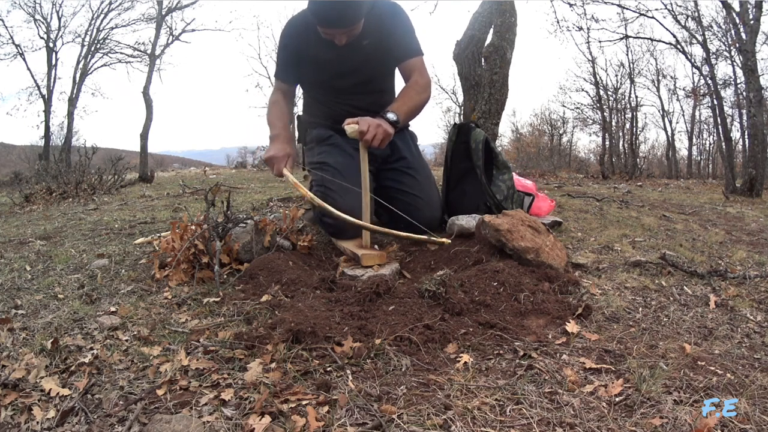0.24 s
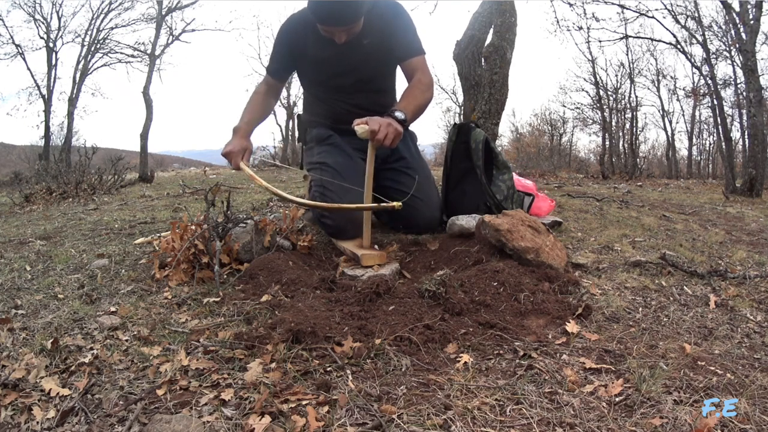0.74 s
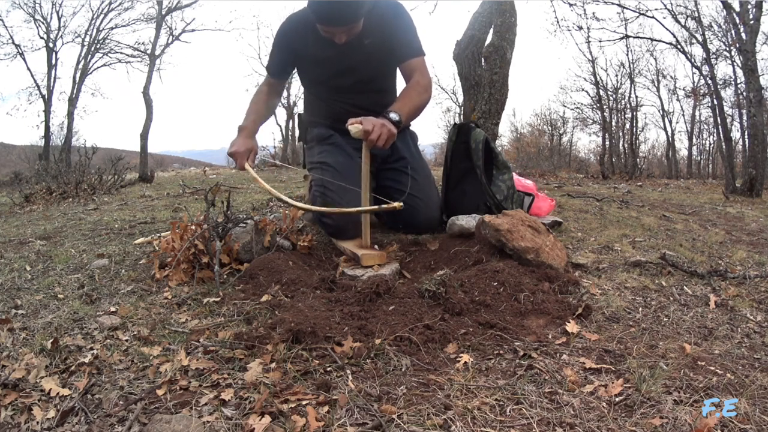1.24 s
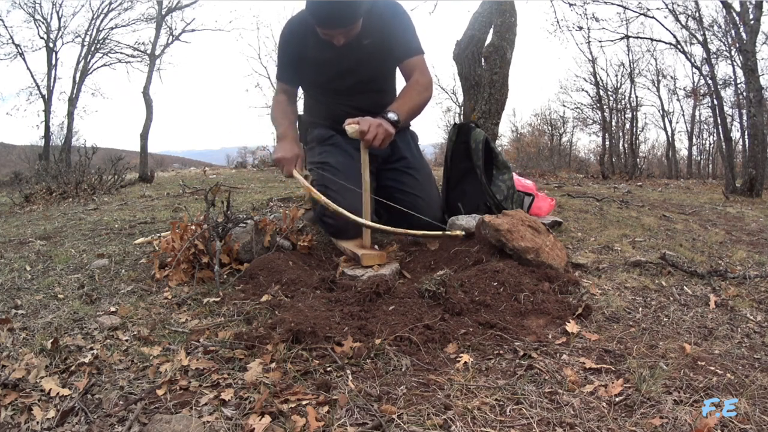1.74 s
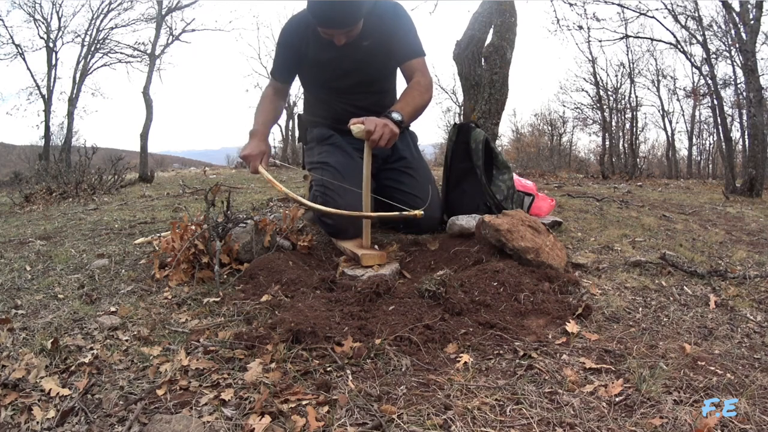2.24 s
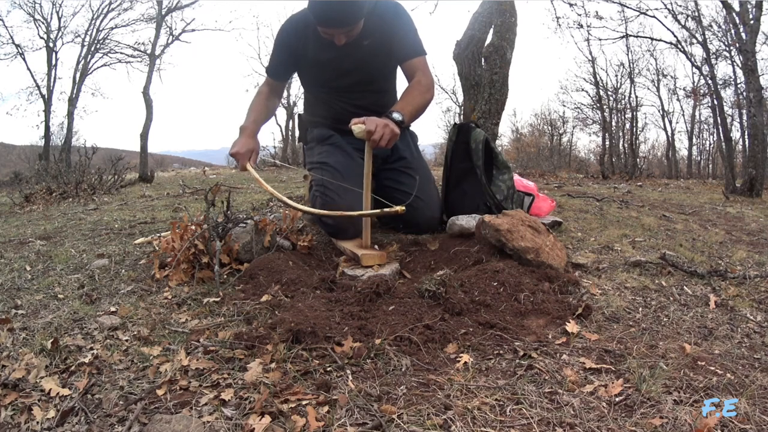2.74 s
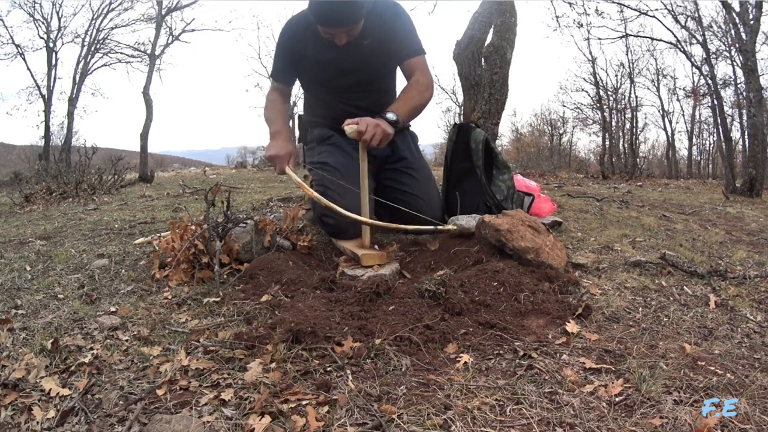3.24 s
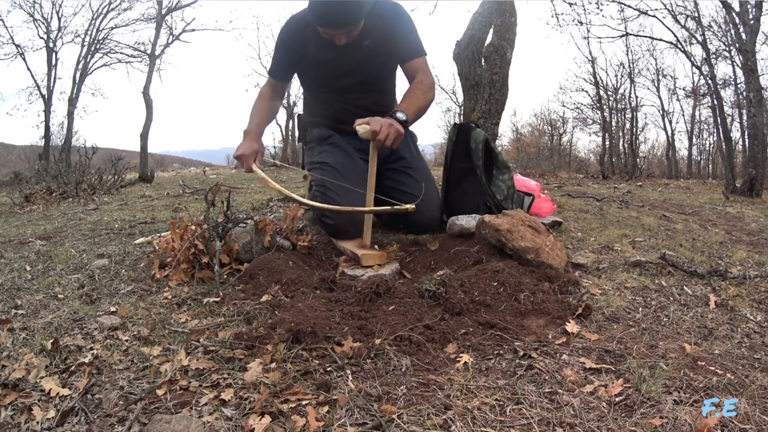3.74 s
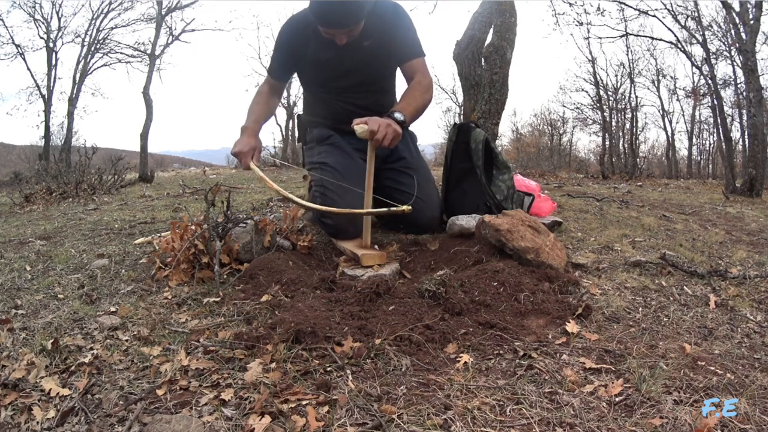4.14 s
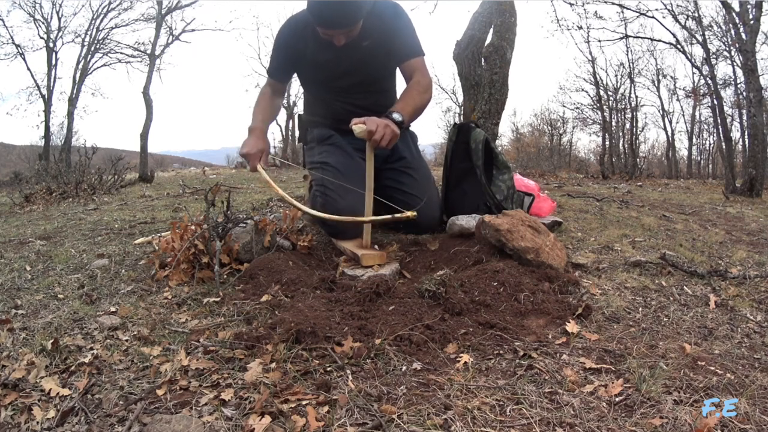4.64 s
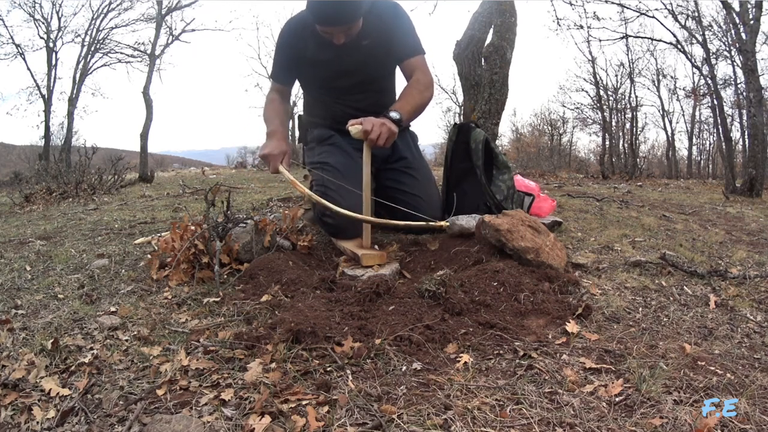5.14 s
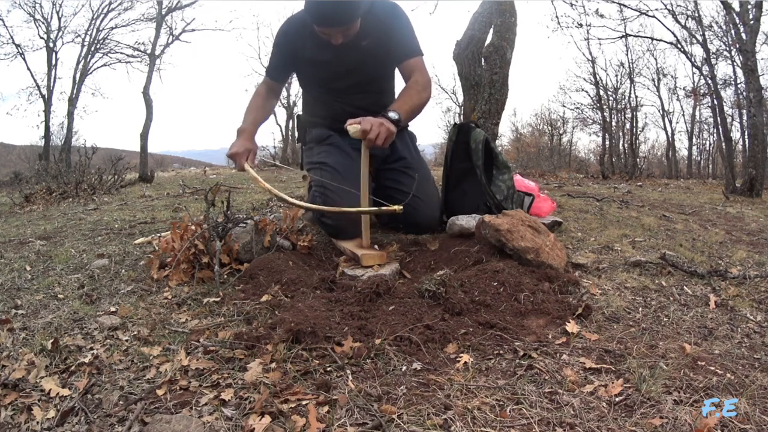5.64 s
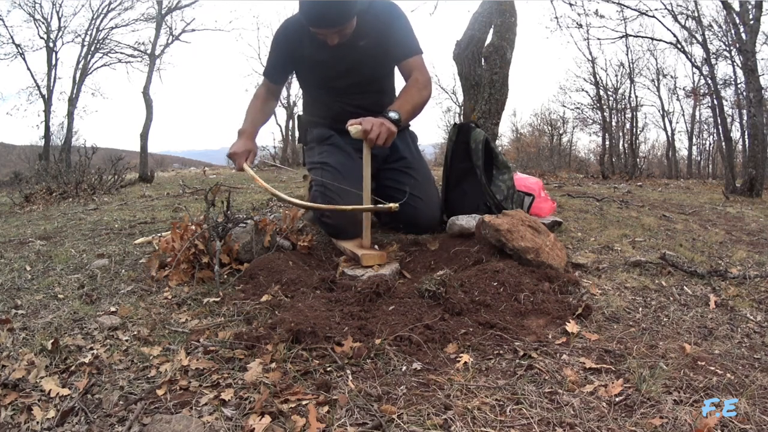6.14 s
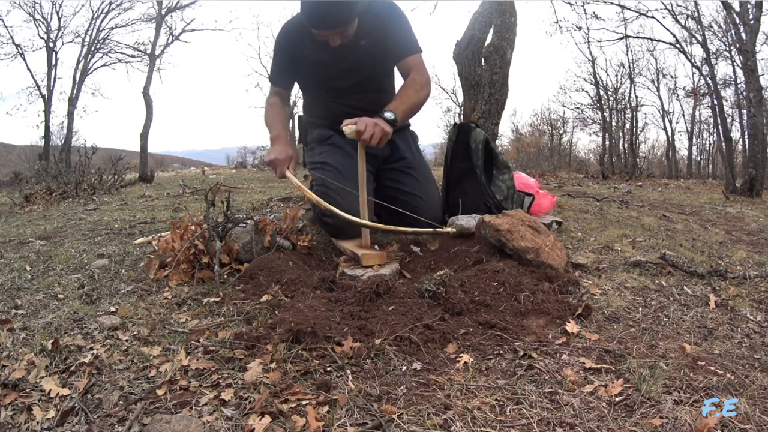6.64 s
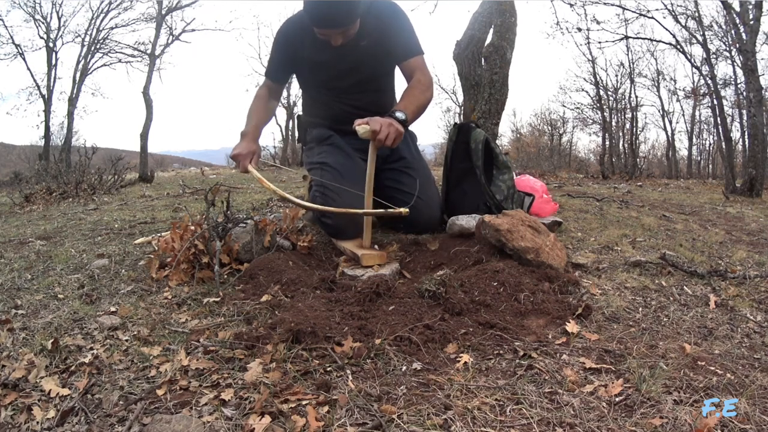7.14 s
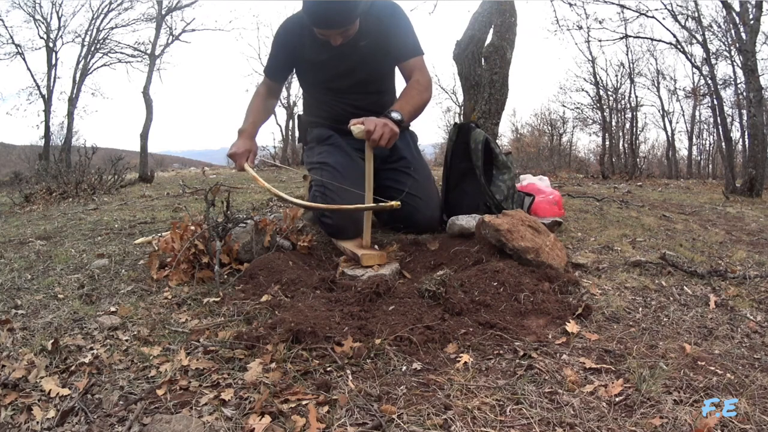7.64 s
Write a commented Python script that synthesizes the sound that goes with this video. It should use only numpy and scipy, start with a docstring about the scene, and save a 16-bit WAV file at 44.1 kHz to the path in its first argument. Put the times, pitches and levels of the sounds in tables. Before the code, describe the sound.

A wooden bow drill squeaks in quick back-and-forth strokes, bright chirping squeals alternating with harsh rasps, outdoors, with wind rumbling on the microphone later.

```python
"""Bow drill in the open air

A dry wooden spindle works against a hearth board, a little left of centre, over faint still air.
Stick-slip makes each light stroke a run of squeaks: short, nearly pure tones with overtones.
On heavy strokes the squeak sinks and breaks into a rasp: jerks and noise drive wood resonances.
After about three seconds wind rumbles on the microphone ports, as filtered noise under gust envelopes."""
import sys
import numpy as np
from scipy import signal
from scipy.fft import rfft, irfft
from scipy.io import wavfile
from scipy.ndimage import uniform_filter1d

SR = 44100
rng = np.random.default_rng(int(sys.argv[2]) if len(sys.argv) > 2 else 0)


def bounce(signal):
    """Save signal as a 16-bit WAV file at the path given by the first command-line argument."""
    frames = np.transpose(np.atleast_2d(signal))
    limited = np.clip(frames, -1, 1)
    pcm = np.round(limited * 32767).astype(np.int16)
    wavfile.write(sys.argv[1], SR, pcm)


N = 347508
TIME = np.arange(N) / SR


def undb(db):
    """Logarithmic level: decibels to amplitude gain."""
    return 10 ** (np.asarray(db) / 20)


def unit(x):
    """Normalisation of power: scale to rms 1."""
    return x / np.sqrt(np.mean(x ** 2))


def walk(rate):
    """Band-limited randomness: low-passed noise of rms 1, its gain down to 1/e at rate Hz."""
    gain = np.exp(-(np.fft.rfftfreq(N, 1 / SR) / rate) ** 2)
    return unit(irfft(rfft(rng.standard_normal(N)) * gain, N))


def flutter(db, rate):
    """Random amplitude modulation: a gain that wanders within db up and down."""
    return undb(db * np.tanh(walk(rate)))


def noise(spectrum):
    """Spectral shaping: Gaussian noise of rms 1, coloured by a table of (f/Hz, level/dB)."""
    hz, db = np.transpose(spectrum)
    frequencies = np.fft.rfftfreq(N, 1 / SR) + 1
    gain = undb(np.interp(np.log(frequencies), np.log(hz), db))
    return unit(irfft(rfft(rng.standard_normal(N)) * gain, N))


def swell(u, lean=.12):
    """Amplitude envelope: quick rise, flat top, slower fall; near half height at u = -1 and 1."""
    return 1 / (1 + (u * (1 - lean * np.tanh(u))) ** 4)


def around(centre, length):
    """Local time scale: the samples near an event, and their time in half lengths from its centre."""
    near = slice(*np.searchsorted(TIME, [centre - 3 * length, centre + 3 * length]))
    return near, 2 * (TIME[near] - centre) / length


# resonances of spindle and board: [f/Hz, width/Hz, relative level/dB]
WOOD_MODES = [(270, 295, 5), (670, 1600, -21.5), (984, 200, 6), (1460, 59, -27), (1973, 255, 16),
              (2505, 158, 15), (3303, 100, 4.5), (3854, 590, 8), (5440, 100, -13), (5920, 1110, 4),
              (8116, 550, 12.5), (9760, 230, 8)]


def ring(force):
    """Modal resonance: the modes trade energy as the contact travels round; their sum keeps rms 1."""
    modes_sum = 0
    for hz, width, db in WOOD_MODES:
        mode = signal.lfilter(*signal.iirpeak(hz, hz / width, fs=SR), force)
        modes_sum = modes_sum + undb(db) * mode * flutter(5, 50)
    return modes_sum / np.sqrt(uniform_filter1d(modes_sum ** 2, size=160))


# spectrum of still open air: [f/Hz, relative level per Hz/dB]
AIR_SPECTRUM = [(25, 2), (220, -2), (600, -10), (4000, -8.5), (15000, -60.5)]


def still_air(mid_db=-54, side_db=-66):
    """Diffuse background noise: a part shared by both channels and a weaker part opposed between them."""
    mid = undb(mid_db) * noise(AIR_SPECTRUM)
    side = undb(side_db) * noise(AIR_SPECTRUM)
    return mid + side * np.array([[1], [-1]])


# the squeal of a heavy stroke: pitch it sinks to (Hz), time constant (s), fade over the stroke (dB)
LOW_HZ, SINK_S, SQUEAL_FADE_DB = 1467, .03, 12.5
# share of the time that it sounds: at the start, and added by the end, when the catches run together
SQUEAL_DUTY, SQUEAL_MERGE = 0.37, 0.27
# slide within a catch, as a share per half length: downward, vanishing by the end of the stroke
HEAVY_SLIDE = -.022
# heavy return strokes: [first catch t/s, time to the last catch t/s, number of later catches,
# first catch nominal level/dB, its nominal f/Hz, its length t/s, low squeal level before its fade/dB,
# delay to the hardest grinding t/s, one spindle turn t/s, grinding level/dB, its growth per turn/dB]
HEAVY_STROKES = [(-.1, .125, 4, -14, 1720, .018, -35, 0.071, 0.036, -14, 0),
                 (0.254, .165, 4, -13.5, 1715, 0.013, -13.5, 0.072, 0.04, -15, 1),
                 (.666, .138, 6, -13.5, 1700, 0.027, -19.5, 0.069, 0.043, -12.5, -1),
                 (1.049, .126, 5, -14.5, 1602, 0.02, -14, 0.069, .037, -11, -1),
                 (1.426, .113, 4, -22.5, 1537, .027, -16, 0.078, 0.042, -12.5, -4),
                 (1.802, .112, 4, -9, 1750, 0.016, -12, 0.069, .035, -15, -1.5),
                 (2.188, .122, 5, -8.5, 1699, .015, -12.5, .073, 0.039, -15, -1),
                 (2.585, .119, 5, -11, 1717, 0.015, -17, 0.063, .03, -14, 0),
                 (2.929, .123, 5, -18, 1614, 0.03, -21, 0.075, 0.041, -13, -1),
                 (3.305, 0.16, 6, -13, 1670, 0.017, -19, 0.071, 0.041, -14.5, -3),
                 (3.677, .107, 4, -12, 1680, 0.014, -11, 0.079, 0.04, -14.5, 1),
                 (4.068, .128, 5, -10, 1714, 0.025, -19, 0.08, 0.039, -14, 0),
                 (4.449, .14, 5, -11, 1789, 0.021, -19, 0.073, 0.036, -15, 1.5),
                 (4.803, .141, 6, -12.5, 1773, 0.02, -15, 0.072, .042, -11.5, 1.5),
                 (5.216, 0.081, 5, -14.5, 1530, 0.015, -18.5, .06, 0.037, -14.5, -5),
                 (5.564, .12, 4, -8.5, 1759, 0.014, -9, 0.09, 0.032, -18, 1.5),
                 (5.947, .142, 6, -13.5, 1730, 0.023, -9, 0.085, 0.036, -17.5, -1.5),
                 (6.343, .121, 4, -11, 1770, 0.021, -8.5, 0.078, 0.039, -21, 2),
                 (6.73, .125, 4, -9, 1737, .011, -8.5, .072, .034, -16.5, 1),
                 (7.102, .12, 4, -11, 1627, 0.014, -10.5, 0.058, 0.03, -14, 4.5),
                 (7.468, .11, 4, -12, 1781, 0.016, -6, 0.075, 0.044, -20, 3.5),
                 (7.878, .12, 4, -9, 1835, 0.023, -19, .075, 0.046, -18.5, 5.5)]


def heavy_catches(start, length, count, first_db, hz, first_length, squeal_db, *_):
    """Loaded stick-slip: after one clear squeak, catches sink, fade and merge as the arm bears down."""
    count = round(count)
    way = np.arange(1, count + 1) / count
    times = start + length * way
    levels = squeal_db - SQUEAL_FADE_DB * way
    pitches = LOW_HZ + (hz - LOW_HZ) * np.exp(-length * way / SINK_S)
    lengths = (SQUEAL_DUTY + SQUEAL_MERGE * way) * length / count
    later = np.column_stack([times, levels, pitches, lengths, HEAVY_SLIDE * (1 - way)])
    return np.vstack([(start, first_db, hz, first_length, HEAVY_SLIDE), later])


# no two catches are alike: scatter of level (dB), and of pitch (share)
CATCH_SCATTER_DB, CATCH_DETUNE = 2.1, 0.00811


def bowing():
    """Irregular friction: all catches in time order, [t/s, level/dB, f/Hz, length/s, slide], scattered."""
    light = [light_catches(*row) for row in LIGHT_STROKES]
    heavy = [heavy_catches(*row) for row in HEAVY_STROKES]
    rows = np.vstack(light + heavy + [turning_chirps()])
    centre, db, hz, length, slide = rows[np.argsort(rows[:, 0])].T
    louder, higher = rng.standard_normal((len(rows), 2)).T
    levels = db + CATCH_SCATTER_DB * louder
    pitches = hz * (1 + CATCH_DETUNE * higher)
    return np.column_stack([centre, levels, pitches, length, slide])


# pitch at which the overtones have their tabled level
USUAL_HZ = 1700
# overtones of a squeak, from the second harmonic up: [level re the fundamental/dB]
OVERTONES_DB = [-12.5, -15.5, -25.5, -35, -42, -104]


def squeaks(catches, load, arch=0.01952, waver=0.019, bite_db=44, max_bite_db=12, scrape_db=-25):
    """Stick-slip oscillation: nearly pure tones; a harder grip drags the pitch and sharpens the slips."""
    tone, loudness = np.zeros(N), np.zeros(N)
    wobble = 1 + waver * walk(193)
    colour = np.array([undb(db) * flutter(5, 70) for db in OVERTONES_DB])
    phase_lags = rng.standard_normal(len(catches))
    for (centre, db, hz, length, slide), lag in zip(catches, phase_lags):
        near, u = around(centre, length)
        if not len(u):
            continue
        shape = swell(u)
        # the pitch arches over each catch and slides down as the load grows
        bend = arch * np.minimum(np.abs(u), 2) ** 2 + load[near] - slide * np.clip(u, -2, 2)
        mean_bend = np.average(bend, weights=shape ** 2)
        pitch = hz * wobble[near] * np.exp(mean_bend - bend)
        phase = 2 * np.pi * np.cumsum(pitch) / SR
        # overtones need a full swing, so the skirts of a squeak are pure; bite is in dB per octave of fall
        bite = np.minimum(bite_db * np.log2(USUAL_HZ / pitch), max_bite_db)
        grip = shape * undb(bite)
        overtones = sum(c[near] * np.sin(k * (phase + lag * k)) for k, c in enumerate(colour, 2))
        tone[near] += undb(db) * shape * (np.sin(phase) + grip * overtones)
        loudness[near] += undb(db) * shape * grip
    # the grain of the wood makes each squeak tremble
    tremble = flutter(1.5, 130)
    scrape = undb(scrape_db) * loudness * ring(rng.standard_normal(N))
    return tone * tremble + scrape


def rubbing(catches, sing_db=-42, scrape_db=-53):
    """Threshold of friction: between catches the lightly turning spindle sings and scrapes faintly."""
    centres, _, pitches, *_ = np.transpose(catches)
    hz = np.interp(TIME, centres, pitches) * (1 + 0.017 * walk(49.9))
    touch = unit(flutter(8, 35))
    # the note only starts when the touch is firm enough, so it comes in small chirps
    chirps = unit(np.maximum(np.tanh(walk(24) - 1), 0))
    singing = undb(sing_db) * chirps * np.sin(2 * np.pi * np.cumsum(hz) / SR)
    scraping = undb(scrape_db) * touch * ring(rng.standard_normal(N))
    return singing + scraping


# grinding of a light stroke: centre and length (shares of the stroke)
SCUFF_AT, SCUFF_LENGTH = .68, 0.44
# grinding of a heavy stroke: share of a turn; level of the surge before and after the hardest one (dB)
SURGE_DUTY, SURGE_BEFORE_DB, SURGE_AFTER_DB = .74, -4.5, -2


def grinding():
    """Periodic contact: a late scuff per light stroke, three turns' surges per heavy: [t/s, level/dB, length/s]."""
    events = [(start + SCUFF_AT * length, db, SCUFF_LENGTH * length)
              for start, length, *_, db in LIGHT_STROKES]
    surges_db = (SURGE_BEFORE_DB, 0, SURGE_AFTER_DB)
    for start, *_, delay, turn, db, growth_db in HEAVY_STROKES:
        for k, surge_db in enumerate(surges_db, -1):
            level = db + k * growth_db + surge_db
            events.append((start + delay + k * turn, level, SURGE_DUTY * turn))
    return events


def tip_pressure():
    """Contact pressure: how hard the tip grinds at each moment, starting and stopping promptly."""
    pressure = np.zeros(N)
    for centre, db, length in grinding():
        near, u = around(centre, length)
        pressure[near] += undb(db) * swell(u) * np.exp(-(u / 2) ** 4)
    return pressure


def rasp(pressure, load, slip_hz=1620, sag=.5, skip_db=-11, level_db=-1.5):
    """Disordered stick-slip: uneven jerks and crushed wood dust ring spindle and board."""
    # the turning tip presses unevenly, and each hard moment throws the slips out of their beat
    throb = flutter(4.5, 110)
    disorder = pressure * throb * flutter(6, 30)
    hz = slip_hz * np.exp(-sag * load + .06 * walk(50) + .33 * disorder * walk(900))
    cycles = np.cumsum(hz) / SR
    # bending waves spread each jerk over its cycle
    slips = 0
    for k in range(1, len(OVERTONES_DB)):
        slips = slips + np.cos(2 * np.pi * k * cycles + k ** 2) / np.sqrt(max(k - 2, 1))
    # strong and weak slips alternate at times, which adds an octave below
    slips = slips * (1 + 2 * undb(skip_db) * walk(68) * np.cos(np.pi * cycles))
    dust = rng.standard_normal(N) * flutter(5, 1200)
    force = unit(slips) + disorder * dust
    body = signal.sosfilt(signal.butter(2, 10500, fs=SR, output="sos"), ring(force))
    return undb(level_db) * pressure * unit(body * throb)


# faint chirps as the bow turns round: [centre t/s, nominal level/dB, nominal f/Hz, length t/s]
CHIRPS = [(0.085, -24, 1632, 0.01), (.215, -20, 1830, 0.0056), (2.76, -33, 1620, 0.0078),
          (3.149, -21, 1600, .007), (5.377, -24.5, 1793, 0.028)]


def turning_chirps():
    """Brief stick-slip: catches with no slide of their own as the bow turns round."""
    return np.array([(*chirp, 0) for chirp in CHIRPS])


# a light stroke: share of the time between catches that squeaks
LIGHT_DUTY = .46
# fall of pitch in mid-stroke and at full unevenness (shares), and of level at full unevenness (dB)
MID_SAG, SHORT_SAG, SHORT_DB = 0.035, 0.17, -6
# range of the slide within a catch (share per half length): down at first, up at the end of the stroke
LIGHT_SLIDE = 0.0247
# light strokes: [first catch t/s, time to the last catch t/s, number of catches, speeding up,
# crowding in mid-stroke, shortening of every other catch (below 0: lengthening), nominal level/dB,
# first catch nominal level/dB, its length t/s, nominal f/Hz, pitch rise as a share, grinding level/dB]
LIGHT_STROKES = [(.138, 0.05, 4, 0.13, -0.27, 0.15, -12, -9, 0.006, 1728, 0.1, -16),
                 (0.483, 0.094, 5, -0.14, .45, 0.25, -11.5, -13.5, 0.0083, 1765, .12, -14.5),
                 (.873, 0.1, 6, 0.19, 0.18, 0.4, -13, -15.5, 0.0053, 1777, 0.052, -17),
                 (1.241, 0.13, 5, -0.18, -0.038, 0.41, -10, -11.5, 0.019, 1777, 0.048, -15.5),
                 (1.596, 0.13, 5, .04, -0.16, 0.11, -12.5, -18.5, 0.0082, 1709, 0.053, -17),
                 (1.985, 0.12, 6, 0.48, 0.42, .3, -7, -20.5, 0.014, 1771, .07, -24),
                 (2.399, 0.1, 5, -.15, .51, -0.019, -8, -13.5, 0.0092, 1766, .07, -21.5),
                 (2.797, 0.083, 5, -0.16, 0.17, 0.44, -8, -16.5, 0.013, 1848, 0.038, -31.5),
                 (3.175, 0.081, 5, 0.031, .2, 0.52, -9, -10.5, 0.016, 1784, 0.096, -34),
                 (3.488, 0.14, 7, 0.2, 0.092, 0.4, -8.5, -17, 0.0076, 1768, 0.1, -28),
                 (3.888, 0.1, 4, -.08, -.05, 0.48, -8.5, -21.5, .01, 1755, 0.09, -20.5),
                 (4.275, .11, 6, 0.38, 0.27, 0.32, -7, -21, 0.013, 1793, .12, -24),
                 (4.639, 0.12, 6, .3, 0.22, 0.56, -8.5, -24, 0.022, 1819, 0.094, -32),
                 (4.999, .102, 5, .18, 0.065, -0.16, -9, -22.5, 0.019, 1758, 0.0033, -28),
                 (5.413, 0.093, 4, .5, .1, -0.3, -12.5, -11, 0.009, 1782, 0.094, -33.5),
                 (5.795, 0.096, 6, 0.095, 0.1, 0.25, -8, -10, 0.018, 1813, 0.047, -25.5),
                 (6.181, 0.085, 5, 0.11, 0.26, -0.27, -8.5, -15, 0.0086, 1725, 0.041, -24.5),
                 (6.564, 0.08, 5, 0.00064, 0.07, -.4, -7.5, -10, 0.01, 1690, 0.03, -24.5),
                 (6.947, 0.082, 5, -0.012, -0.066, -0.31, -8.5, -13.5, 0.012, 1706, .065, -21.5),
                 (7.291, 0.11, 6, 0.19, 0.18, -0.28, -9.5, -15, 0.021, 1730, 0.082, -29),
                 (7.713, 0.082, 5, 0.031, -0.017, -0.34, -8.5, -10.5, 0.0098, 1737, 0.058, -27.5)]


def light_catches(start, length, count, speeding, crowd, uneven, db, first_db, first_length, hz, rise, _):
    """Alternating stick-slip: every other catch differs in length and pitch, which climbs as the arm eases."""
    order = np.arange(round(count))
    way = order / order[-1]
    crowding = crowd * np.sin(2 * np.pi * way) / (2 * np.pi)
    times = start + length * (way + speeding * way * (1 - way) + crowding)
    short = uneven * (order[::-1] % 2)
    pitch = hz * np.exp(rise * (way - .5) - MID_SAG * np.sin(np.pi * way) - SHORT_SAG * short)
    lengths = LIGHT_DUTY * np.gradient(times) * (1 - short + uneven / 2)
    # the first catch has its own level and length
    levels = np.where(order, db + SHORT_DB * short, first_db)
    lengths = np.where(order, lengths, first_length)
    return np.column_stack([times, levels, pitch, lengths, LIGHT_SLIDE * (way - .5)])


# whistles when the dry tip scuffs hard: [centre t/s, level/dB, length t/s]
WHISTLES = [(0.188, -13.5, 0.012), (0.58, -15, 0.017), (0.97, -12.5, 0.013)]


def whistles(whistle_hz=2960, under_hz=1060, under_db=-13, waver=0.015):
    """Whistling: a higher spindle note sounds, with a weaker short wooden tone below it."""
    strength = np.zeros(N)
    for centre, db, length in WHISTLES:
        near, u = around(centre, length)
        strength[near] += undb(db) * swell(u)
    clock = 2 * np.pi * np.cumsum(1 + waver * walk(155)) / SR
    return strength * (np.sin(whistle_hz * clock) + undb(under_db) * np.sin(under_hz * clock))


# ramps before and after a gust's full strength
GUST_RISE_S, GUST_FALL_S = 0.13, 0.22
# gusts at the microphone: [start of full strength t/s, its length t/s, relative level/dB]
GUSTS = [(2.897, 4.2, -52.5), (3.13, 0.14, -34.5), (3.5, 0.67, -33.5), (3.72, 0.21, -33.5),
         (4.457, 0.64, -25), (5.39, 0.28, -33), (5.977, 0.24, -35), (6.3, 0.22, -38.5), (7.273, 0.85, -25)]
# sudden buffets on the ports: [centre t/s, relative level/dB]
BUFFETS = [(3.692, -25), (3.84, -21.5), (4.481, -18), (4.858, -21), (5.52, -14.5), (7.28, -24),
           (7.622, -22), (7.676, -25), (7.81, -10.5)]
# wind spectrum shared by both ports: [f/Hz, relative level per Hz/dB]
WIND_SHARED = [(20, -6), (60, 0), (145, -1), (300, -11), (700, -27), (2000, -62)]
# wind spectrum opposed between the ports: [f/Hz, relative level per Hz/dB]
WIND_OPPOSED = [(20, -24), (130, 0), (290, -2), (600, -16), (2000, -54)]


def wind(shared_db=-4, opposed_db=-3, buffet_s=0.025):
    """Turbulent pressure: gusts rumble on two ports, now and then with a short thump."""
    eddies = unit(flutter(6, 35))
    gusts = np.zeros(N)
    for start, length, db in GUSTS:
        corners = [-GUST_RISE_S, 0, length, length + GUST_FALL_S]
        gusts += undb(db) * np.interp(TIME - start, corners, [0, 1, 1, 0]) ** 2
    strength = eddies * gusts
    for centre, db in BUFFETS:
        near, u = around(centre, buffet_s)
        strength[near] += undb(db) * swell(u)
    shared = undb(shared_db) * noise(WIND_SHARED)
    opposed = undb(opposed_db) * noise(WIND_OPPOSED)
    ports = strength * np.array([shared + opposed, shared - opposed])
    # the microphone cuts the deepest bass
    band = signal.butter(2, (32, 2000), "bandpass", fs=SR, output="sos")
    return signal.sosfilt(band, ports)


def clearing(x, near_db=-23, near_t60=0.37, far_db=-35, far_t60=1.0):
    """Diffuse reverberation: ground and body scatter sound at once; bare trees return a faint tail."""
    t = TIME[:SR // 2]
    fade = 0
    for db, t60 in ((near_db, near_t60), (far_db, far_t60)):
        decay = np.exp(-np.log(1000) * t / t60)
        fade = fade + undb(db) * decay / np.linalg.norm(decay)
    return np.array([signal.fftconvolve(x, fade * rng.standard_normal(len(t)))[:N] for _ in range(2)])


def scene(pan_db=0.42):
    """Superposition: the drill just left of centre and its reverberation, in still air, then wind."""
    catches, pressure = bowing(), tip_pressure()
    # the hand's load builds before the tip grinds and eases after it
    load = np.sqrt(np.abs(uniform_filter1d(pressure, size=4000)))
    drill = squeaks(catches, load) + rasp(pressure, load) + whistles() + rubbing(catches)
    panned = drill * undb([[pan_db], [-pan_db]])
    return panned + clearing(drill) + wind() + still_air()


def record(dry):
    """Soft saturation and band limiting: peaks are rounded below 0.9, then a steep low-pass cuts the top."""
    rounded = dry / (1 + (dry / .9) ** 6) ** (1 / 6)
    low_pass = signal.ellip(10, .1, 80, 15750, fs=SR, output="sos")
    return signal.sosfilt(low_pass, rounded)


dry = scene()
out = record(dry)
bounce(out)
```